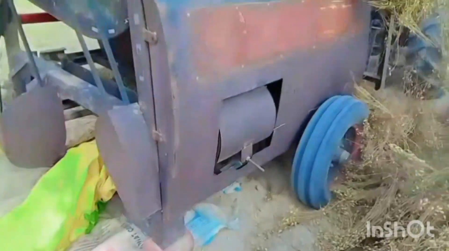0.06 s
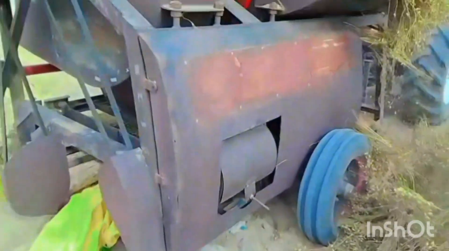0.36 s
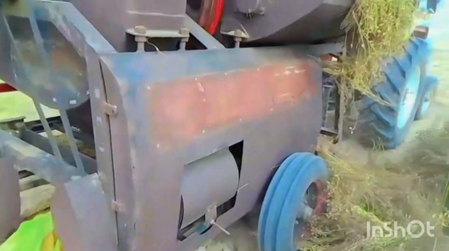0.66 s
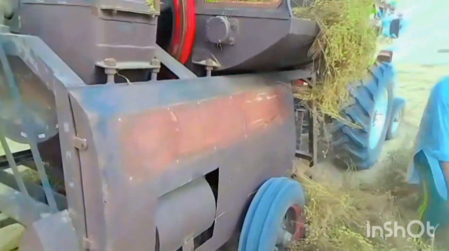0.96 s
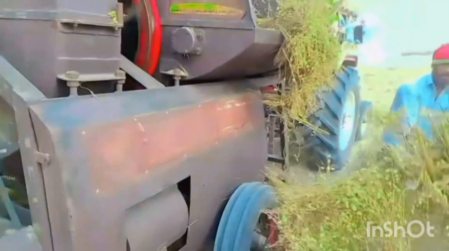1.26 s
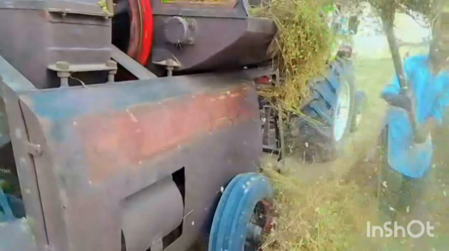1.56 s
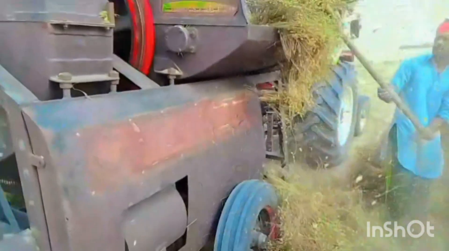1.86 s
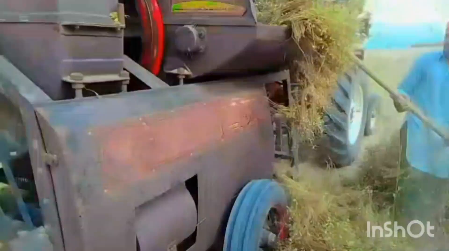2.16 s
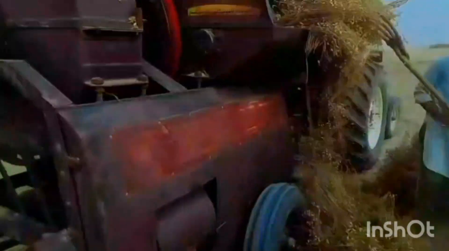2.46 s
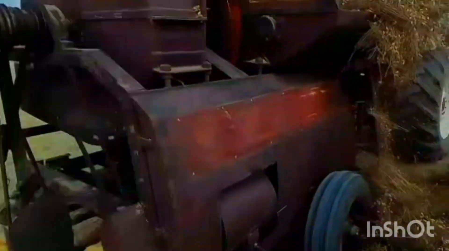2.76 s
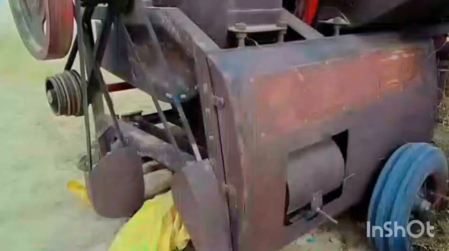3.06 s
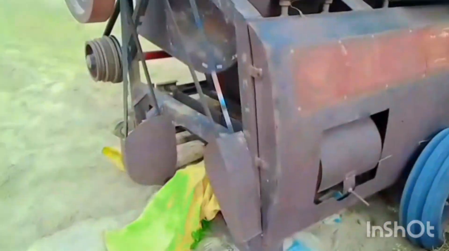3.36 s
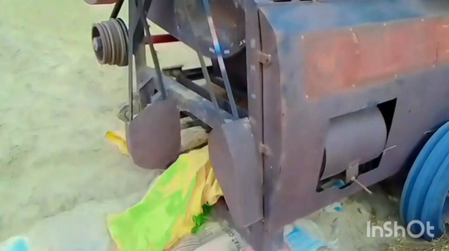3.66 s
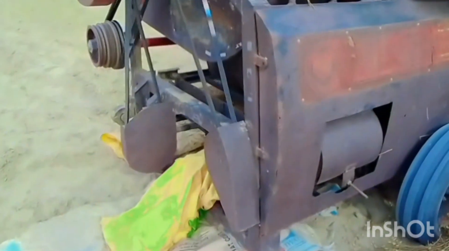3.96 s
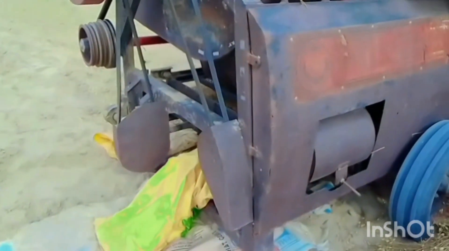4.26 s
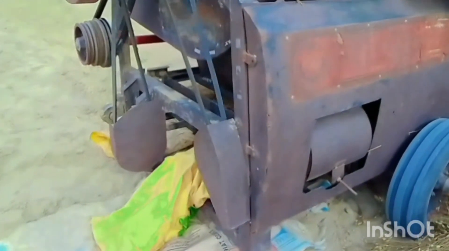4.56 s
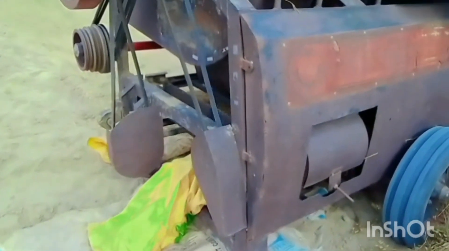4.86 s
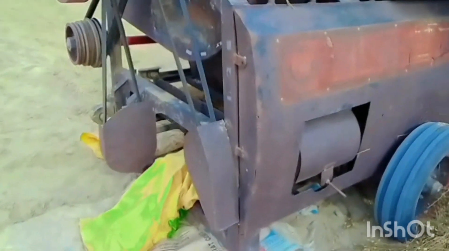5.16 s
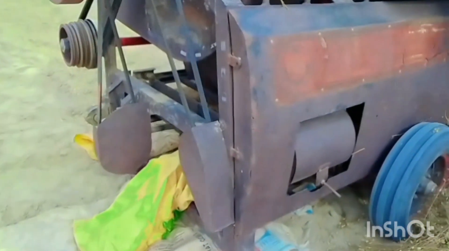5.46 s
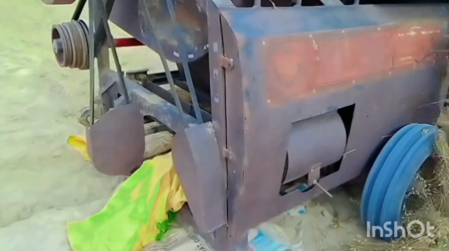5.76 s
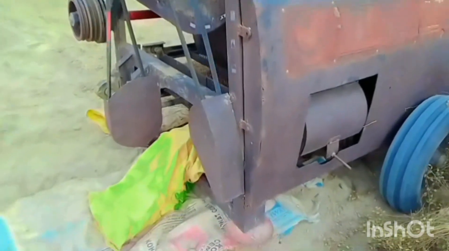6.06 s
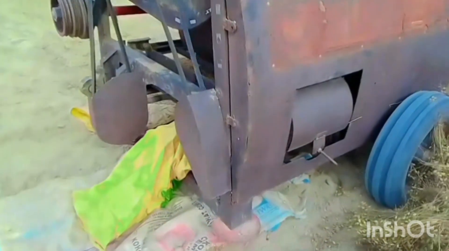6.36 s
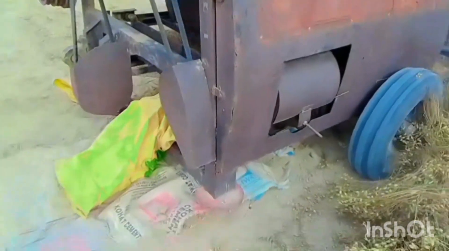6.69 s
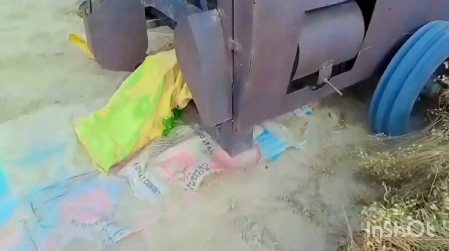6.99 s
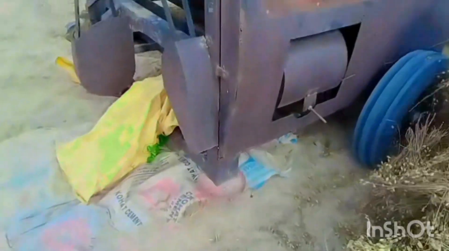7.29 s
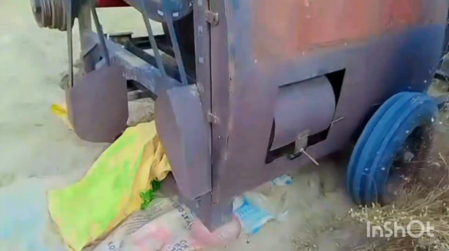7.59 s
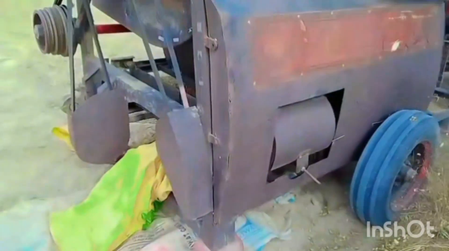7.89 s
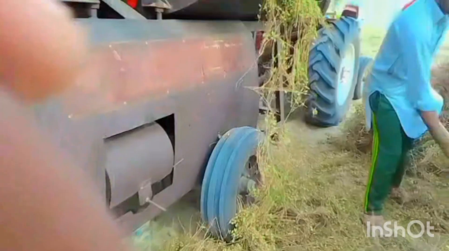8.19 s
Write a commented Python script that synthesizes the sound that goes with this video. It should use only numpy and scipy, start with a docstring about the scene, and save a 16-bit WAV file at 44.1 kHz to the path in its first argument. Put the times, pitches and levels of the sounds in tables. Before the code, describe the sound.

Close, continuous rattle and churn of a threshing machine, with spraying chaff, humming shafts and a tractor's drone behind it.

```python
"""A crop thresher runs steadily in an open field, the microphone hand-held close beside its casing.
The drum beats stalks against sheet steel, and grain and chaff spray over the sieves.
Behind that, belt-driven shafts and fans hum and the diesel tractor that drives them drones.
A hand shifts around the microphone and colours the treble; the sound is cut off shortly before the end."""
import sys
import numpy as np
from scipy import signal
from scipy.fft import rfft, irfft, next_fast_len
from scipy.io import wavfile
from scipy.ndimage import uniform_filter1d, map_coordinates

SR = 44100
rng = np.random.default_rng(int(sys.argv[2]) if len(sys.argv) > 2 else 0)


def to_wav(s):
    """Save 16-bit WAV."""
    ch = np.atleast_2d(s).T  # columns
    pcm = np.round(np.clip(ch, -1, 1) * 32767)  # PCM
    wavfile.write(sys.argv[1], SR, pcm.astype(np.int16))


N = 371715
TIME = np.arange(N) / SR
TOP_HZ = 15500  # upper band limit


def amp(db):
    """Decibels to gain."""
    return 10 ** (np.asarray(db) / 20)


def unit(x):
    """Scale to rms 1."""
    return x / np.sqrt(np.mean(x ** 2) + 1e-20)


def curves(rows):
    """One value per sample for each column after the time."""
    times, *columns = np.transpose(rows)
    return [np.interp(TIME, times, column) for column in columns]


def wobble(rate):
    """A smooth random curve, rate knots a second."""
    knots = rng.standard_normal(int(N * rate / SR) + 4)
    return map_coordinates(knots, [TIME * rate])


def filtered(x, response):
    """x times a complex response of frequency."""
    size = next_fast_len(N + SR // 2)
    return irfft(rfft(x, size) * response(np.fft.rfftfreq(size, 1 / SR)), size)[:N]


def gain_at(hz, points):
    """Gain along (f/Hz, level/dB) points, joined on a log frequency axis."""
    point_hz, db = np.transpose(points)
    return amp(np.interp(np.log(hz + 1), np.log(point_hz), db))


def coloured(x, points):
    """x through a causal body whose gain follows (f/Hz, level/dB) points."""
    size = 16384
    cepstrum = irfft(np.log(gain_at(np.fft.rfftfreq(size, 1 / SR), points)))
    cepstrum[1:size // 2] *= 2  # fold to minimum phase
    cepstrum[size // 2 + 1:] = 0
    impulse_response = irfft(np.exp(rfft(cepstrum)))
    return signal.fftconvolve(x, impulse_response)[:N]


def ringing(x, modes):
    """x through (f/Hz, width/Hz, level/dB) resonances with steep skirts."""
    def band(f, hz, width):
        return 1j * f * width / (hz * hz - f * f + 1j * f * width)
    return filtered(x, lambda f: sum(amp(db) * band(f, hz, width) ** 2 for hz, width, db in modes))


def peaking(x, centre_hz, gain_db, width_hz):
    """x through a resonance that slides in pitch and strength."""
    f, t, spectra = signal.stft(x, SR, nperseg=512)
    at = np.minimum((t * SR).astype(int), N - 1)
    bump_db = gain_db[at] / (1 + (2 * (f[:, None] - centre_hz[at]) / width_hz) ** 2)
    return signal.istft(spectra * amp(bump_db), SR, nperseg=512)[1][:N]


def impacts(rate, spread_db):
    """Random blows of uneven size, rate a second, rms 1."""
    hits = rng.random(N) < rate / SR
    sizes = amp(spread_db * rng.standard_normal(N))
    return unit(hits * rng.choice([-1, 1], N) * sizes)


def tone(cycles, waver_rad, flutter_db):
    """A hum of rms 1 whose phase and strength are shaken by the machine."""
    strength = amp(flutter_db * wobble(9))
    phase = 2 * np.pi * (cycles + rng.random()) + waver_rad * wobble(7)
    return unit(strength * np.sin(phase))


# the tractor's drone behind the thresher: multiple of the firing rate, level/dB
EXHAUST_ORDERS = [(1, -41), (2, -32), (3, -41), (4, -40), (7, -36), (9, -38.5), (13, -46.5), (15, -41.5)]
def engine(firings):
    """The diesel's exhaust drones at multiples of its firing rate; higher orders waver more."""
    return sum(amp(db) * tone(k * firings, waver_rad=.02 * k, flutter_db=.5) for k, db in EXHAUST_ORDERS)


# hum of the shafts at mean engine speed: f/Hz, relative level/dB
SHAFT_TONES = [(101.6, -38), (171.9, -44), (206.2, -40), (249.7, -39), (285.3, -41.5), (323.3, -46.5),
               (334.8, -45), (356.6, -39), (468.3, -38), (471.4, -39), (499.3, -40.5), (718.7, -49.5)]
def shafts(firings):
    """Belts tie every shaft's hum to the engine's speed."""
    clock = firings / firings[-1] * N / SR
    return amp(-1) * sum(amp(db) * tone(hz * clock, waver_rad=.49, flutter_db=2) for hz, db in SHAFT_TONES)


# the blade tone at the microphone: t/s, relative level/dB
FAN_LEVEL = [(0, -32), (.6, -31.5), (2.3, -31), (2.8, -26.5), (3.7, -25.5), (4.6, -29), (5.2, -26.5),
             (7, -29), (7.7, -29.5)]
def fan(firings):
    """Eight blades pass for each engine firing and make a gusty tone."""
    blades = 8 * firings + .06 * wobble(45)
    gusts = amp(2 * wobble(25))
    return amp(curves(FAN_LEVEL)[0] - 3) * gusts * tone(blades, waver_rad=.42, flutter_db=.5)


def tick(start_s=6.9576, level_db=-45.5, decay_s=.12, low_hz=10500):
    """One thin, short burst high above the hiss."""
    age = TIME - start_s
    burst = unit(filtered(rng.standard_normal(N), lambda hz: (hz > low_hz) & (hz < TOP_HZ)))
    return burst * (age > 0) * amp(level_db - 60 * np.abs(age) / decay_s)


# grain on the steel near the microphone: t/s, relative level/dB
KERNEL_HITS = [(0.1197, -34), (0.23, -33.5), (2.0509, -35.5), (2.0798, -43.5), (2.1396, -32.5),
               (2.9259, -36), (3.9146, -31), (5.7559, -31.5), (5.967, -29), (6.1899, -33), (6.7716, -28),
               (7.2271, -29), (7.4132, -30.5)]
# colour of flying grain and chaff, for the single hits and the spray: f/Hz, level/dB
GRAIN_COLOUR = [(2000, -45.5), (3900, 1), (4400, 0.5), (5600, 1), (7000, -2), (8300, -4.5), (9800, -6.5),
                (11000, -11.5), (13000, -19.5), (15500, -25.5)]
def kernels(decay_s=.025):
    """Single hard kernels crack against the sheet."""
    age = np.arange(SR // 20) / SR
    cracks = np.zeros(N)
    for start, db in KERNEL_HITS:
        crack = amp(db - 2 - 60 * age / decay_s) * rng.standard_normal(len(age))
        cracks[round(start * SR):][:len(age)] += crack
    return coloured(cracks, GRAIN_COLOUR)


# the chaff's hiss beside the casing: t/s, relative level/dB
HISS_LEVEL = [(.3, -43.5), (1.2, -47.5), (2.7, -48.5), (3.3, -47), (4.1, -47.5), (4.4, -44.5), (5.3, -45),
              (7.7, -45)]
# ringing of the thin sieves: f/Hz, width/Hz, level/dB
SIEVE_MODES = [(4290, 350, -0.5), (5460, 420, -1), (6830, 540, -4), (8380, 550, -6.5)]
def chaff(firings, feed_db):
    """Grain and chaff hiss over the sieves, in spurts that follow the machine's shaking."""
    spurt = np.exp(-((firings + .35) % 1) / .5)
    flow = amp(2.8 * spurt + .9 * wobble(50))
    spray = impacts(rate=6000, spread_db=5) + 1.2 * rng.standard_normal(N)
    hiss = unit(coloured(flow * spray, GRAIN_COLOUR))
    ring = unit(ringing(flow * impacts(rate=3000, spread_db=3.5), SIEVE_MODES))
    return amp(curves(HISS_LEVEL)[0] + feed_db) * (amp(6) * hiss + amp(-4.5) * ring)


# colour of the steel panels, close up: f/Hz, level/dB
PANEL_COLOUR = [(350, -54.5), (570, -4), (670, 1), (950, 0), (1200, -1), (1380, -5.5), (1620, -4),
                (2100, -7.5), (2600, -10), (3150, -10), (3550, -13), (3900, -27), (5000, -50.5),
                (9000, -91.5)]
# ringing of the casing: f/Hz, width/Hz, level/dB
CASING_MODES = [(692, 48, -4), (842, 88, -5.5), (1277, 51, 1.5), (1512, 39, -0.5), (1640, 61, -2.5),
                (1869, 100, -5.5)]
def panels(feed_db):
    """Stalks and loose parts clatter on the steel panels and set the casing ringing."""
    blows = impacts(rate=2600, spread_db=3) + 1.06 * rng.standard_normal(N)
    clatter = unit(coloured(blows, PANEL_COLOUR))
    ring = unit(ringing(impacts(rate=1200, spread_db=1), CASING_MODES))
    return amp(-25 + feed_db + .62 * wobble(35)) * (clatter + amp(-11) * ring)


# the crop fills the machine, runs evenly, then lighter: t/s, relative level/dB
CROP_LOAD = [(0, -2.5), (.48, -1.2), (.85, 0.6), (1.4, -0.24), (3.15, 0.4), (4.18, -0.5), (4.3, -1.7),
             (5.2, -0.6), (6.3, -2), (7.7, -2.65)]
# big wads of stalks bursting through the drum: t/s, thump rise/dB, rasp rise/dB
STALK_WADS = [(.125, 4.5, 4.5), (.563, 3, 3), (.86, 2, 2.5), (1.117, 5.5, 3.5), (1.96, 3, 1), (2.09, 1, 5),
              (2.697, 3.5, 3.5), (2.98, 1.5, -2), (3.28, 4.5, 3), (3.474, 2.5, 3.5), (3.664, 2, 1),
              (3.97, 2.5, -1), (4.58, 3, 0.5), (5.84, 4, 4), (6.126, 4, 5.5), (6.356, 3.5, 2),
              (6.787, 5, 5), (7.318, 6.5, 4.5)]
def feed(lumps_per_s=11, wad_half_s=.019):
    """Slow load, small random lumps and big wads swing the levels of drum, panels and chaff, in dB."""
    load_db, = curves(CROP_LOAD)
    thump_db, rasp_db = sum(np.outer(rise_db, np.exp(-((TIME - peak_s) / wad_half_s) ** 2))
                            for peak_s, *rise_db in STALK_WADS)
    lumps = wobble(lumps_per_s)
    drum_db = load_db + .7 * wobble(lumps_per_s) + thump_db
    panel_db = load_db + .5 * lumps + .4 * (thump_db + rasp_db)
    chaff_db = .4 * lumps + rasp_db
    return drum_db, panel_db, chaff_db


# colour of the drum housing, heard from beside it: f/Hz, level/dB
HOUSING_COLOUR = [(20, -28.5), (35, -30.5), (58, -11.5), (115, -10.5), (150, -4), (240, 0), (380, 0),
                  (440, -4), (500, -1), (565, -14), (700, -21.5), (1200, -84)]
def drum(firings, feed_db, passes_per_firing=.779):
    """Every pass of the beater thumps a different bite of stalks against the housing."""
    passes = passes_per_firing * firings
    bite = rng.random(int(passes[-1]) + 1)[passes.astype(int)]
    thump = amp(7.5 * (bite - .3) * np.sin(np.pi * passes) ** 2)
    churn = coloured(impacts(rate=2200, spread_db=1.2) * thump, HOUSING_COLOUR)
    energy = np.abs(uniform_filter1d(churn ** 2, size=5000))
    even_churn = unit(churn / (energy + 1e-12) ** .21)  # fairly steady between wads
    return amp(-23.54 + feed_db) * even_churn


# the tractor's engine speed: t/s, firing rate/Hz
ENGINE_SPEED = [(0.2, 45.45), (0.7, 45.48), (1.5, 45.62), (2.3, 45.67), (3.2, 45.8), (4.2, 45.81),
                (5, 45.76), (5.8, 45.71), (6.6, 45.79), (7.4, 45.86)]
def scene():
    """Tractor and thresher turning together in the open field, heard in mono beside the casing."""
    firings = np.cumsum(curves(ENGINE_SPEED)[0]) / SR
    drum_db, panel_db, chaff_db = feed()
    drive = engine(firings) + shafts(firings) + fan(firings)
    threshing = drum(firings, drum_db) + panels(panel_db) + chaff(firings, chaff_db)
    return (drive + threshing + kernels() + tick())[None]


# the hand on the microphone: closes t/s, lets go t/s, depth (0-1)
HAND_GRIPS = [(0, 0.269, 0.8), (5.724, 7.8, 0.95)]
def cupping(close_s=.032, open_s=.25, relaxed=.09):
    """How far the hand cups the microphone (0-1): it closes quickly, holds and opens slowly."""
    held = np.zeros(N)
    for start, end, depth in HAND_GRIPS:
        closing = np.clip((TIME - start) / close_s, 0, 1)
        opening = np.clip(1 - (TIME - end) / open_s, 0, 1)
        held += depth * closing * opening
    return np.clip(held, relaxed, 1)


# the hollow of the hand around the microphone: f/Hz, level/dB
HAND_HOLLOW = [(400, -1), (480, -2.5), (700, 1), (1500, 0), (2000, -2), (2500, 1.5), (3300, -2.5),
               (3850, 5.5), (4150, 10), (4470, 16.5), (4950, 6.5), (6300, 8), (7300, 4.5), (9000, -2.5)]
# resonance of the air between finger and case: t/s, f/Hz, undamped level/dB
GAP_RESONANCE = [(.55, 3360, 7.5), (.9, 2730, 3.5), (2.3, 2600, 3.5), (2.8, 3050, 0.5), (4.1, 3230, 3),
                 (4.6, 3400, 7), (5.7, 3420, 6.5), (6.1, 3200, 9)]
# top treble let in by the fingers: t/s, relative level/dB
TREBLE_LIFT = [(.08, -4.5), (.15, 9.5), (.4, 11.5), (.65, 8.5), (.85, 4), (2.3, 2.5), (2.9, -1), (4.1, 2.5),
               (4.4, 5.5), (4.8, 5), (5.8, 9.5), (6.2, 8)]
def hand(sound, gap_damping=.6):
    """The cupped hand and a finger gap resonate at the microphone; a tighter grip damps the gap."""
    cup = cupping()
    cupped = filtered(sound, lambda hz: gain_at(hz, HAND_HOLLOW))
    heard = (1 - cup) * sound + cup * cupped
    gap_hz, gap_db = curves(GAP_RESONANCE)
    heard = peaking(heard, gap_hz, gap_db * (1 - gap_damping * cup), width_hz=960)
    # the shortest waves come through only where the fingers leave room
    top = filtered(heard, lambda hz: np.clip((hz - 10000) / 3500, 0, 1))
    top_db, = curves(TREBLE_LIFT)
    return heard + (amp(top_db) - 1) * top


def record(dry):
    """One hand-held microphone: the hand colours the treble, the sound cuts off, the band is limited."""
    stop_s, fade_s = 7.747, .012
    fade = np.clip((stop_s - TIME) / fade_s + 1, 0, 1)
    return filtered(hand(dry[0]) * fade, lambda hz: hz < TOP_HZ)[None]


dry = scene()
out = record(dry)
to_wav(out)
```